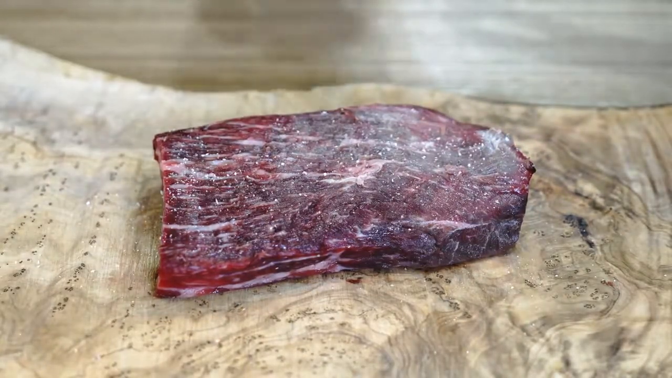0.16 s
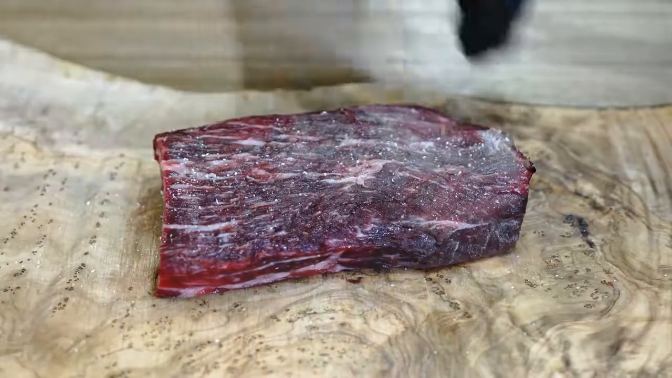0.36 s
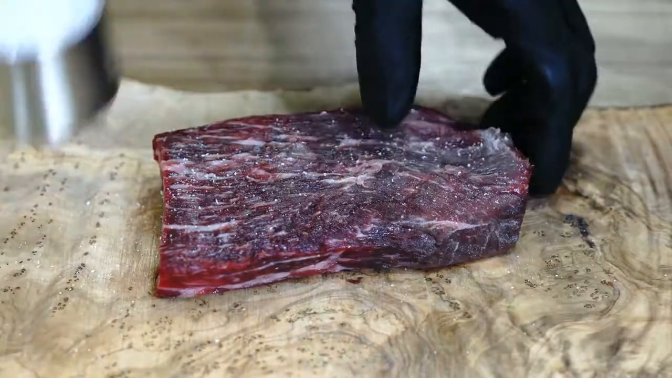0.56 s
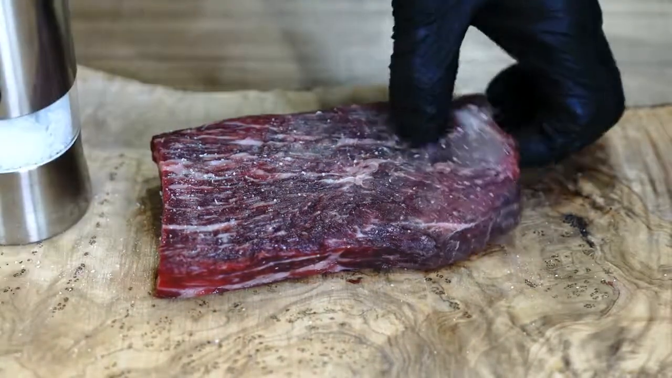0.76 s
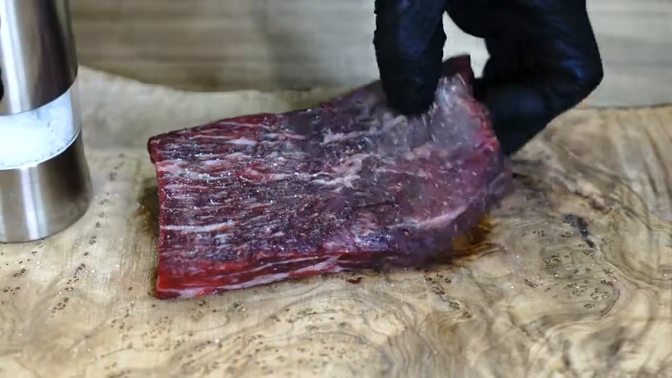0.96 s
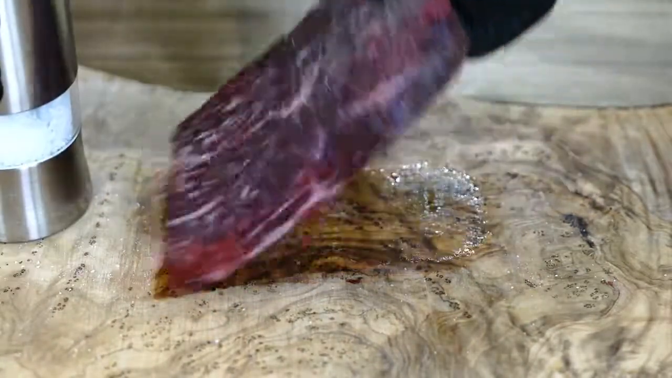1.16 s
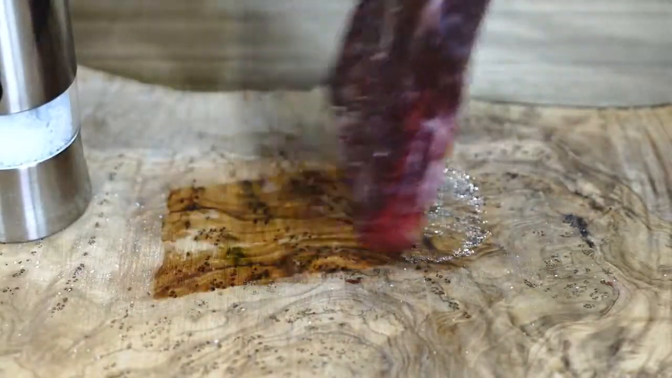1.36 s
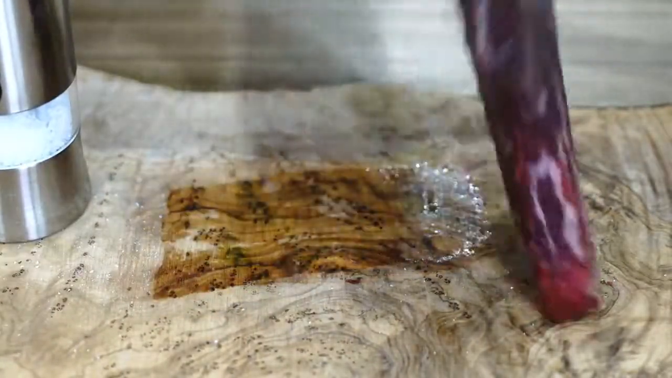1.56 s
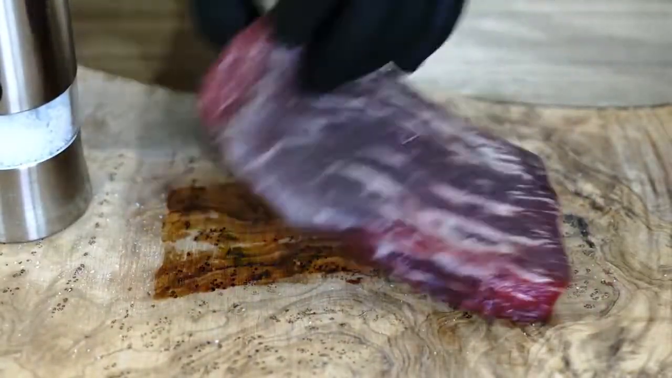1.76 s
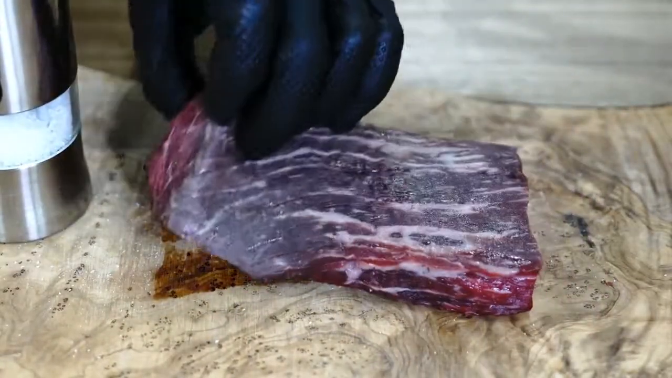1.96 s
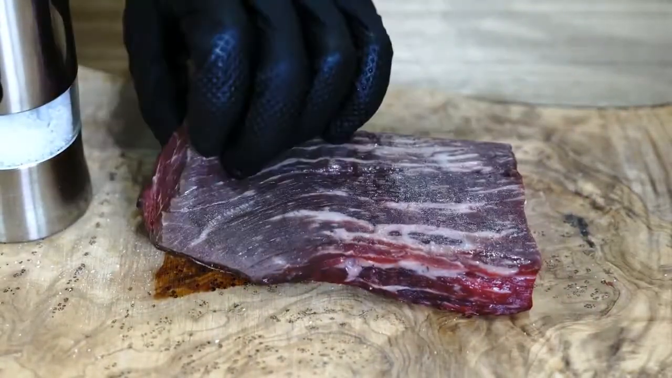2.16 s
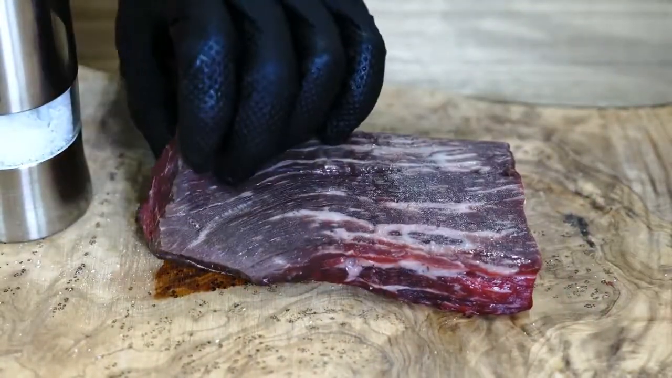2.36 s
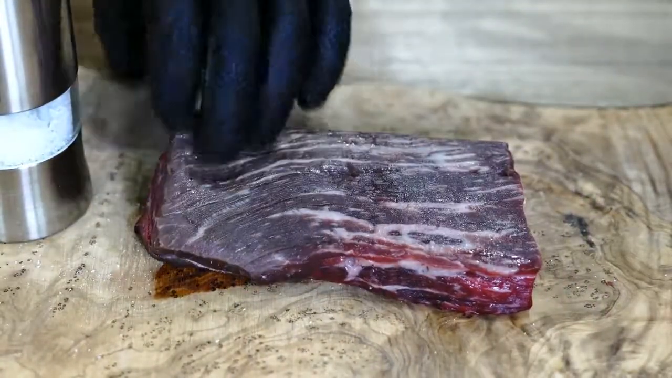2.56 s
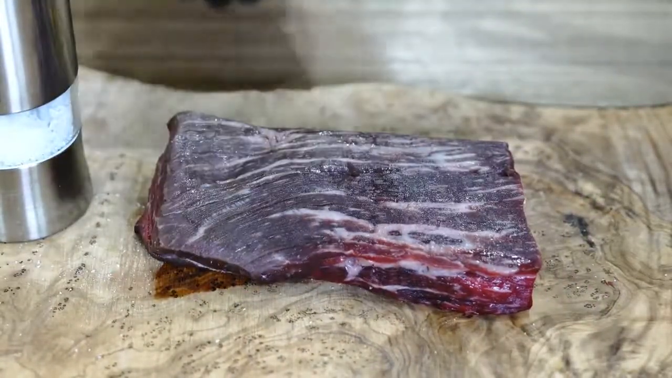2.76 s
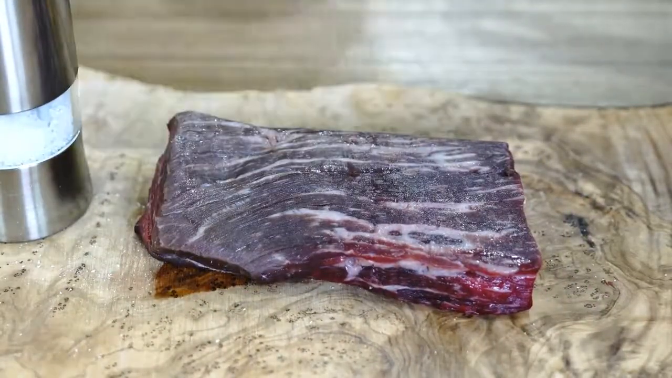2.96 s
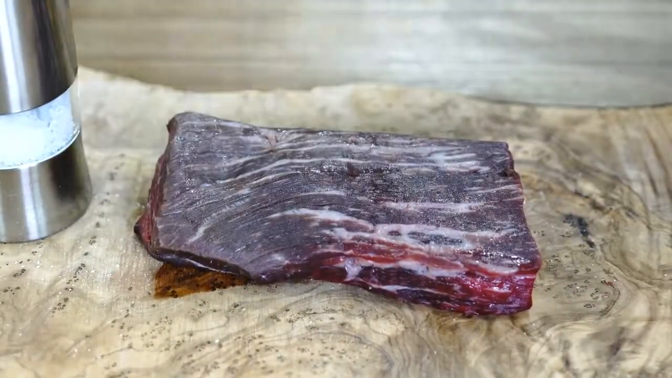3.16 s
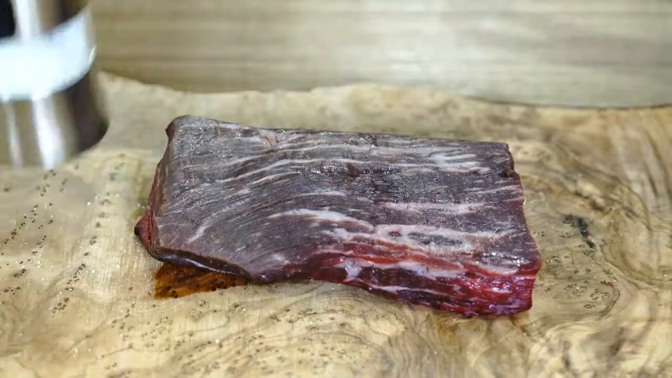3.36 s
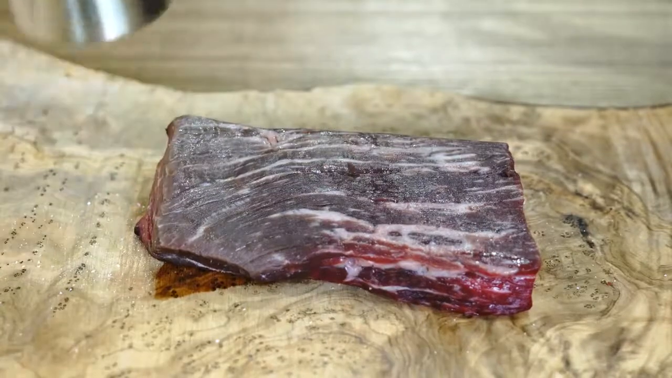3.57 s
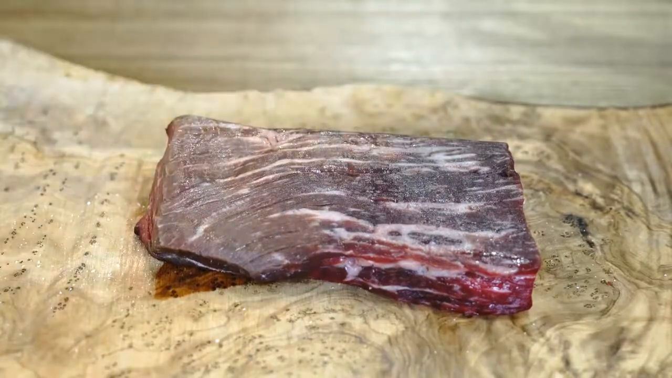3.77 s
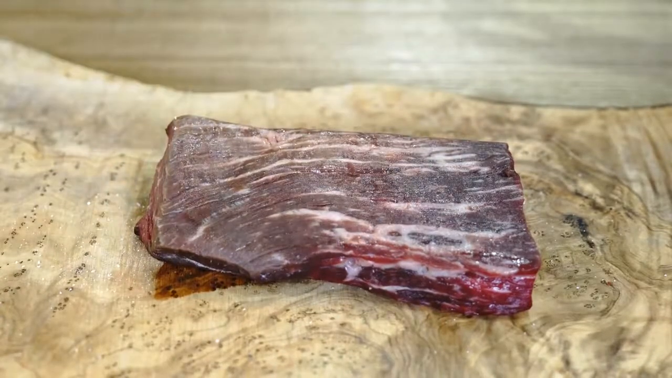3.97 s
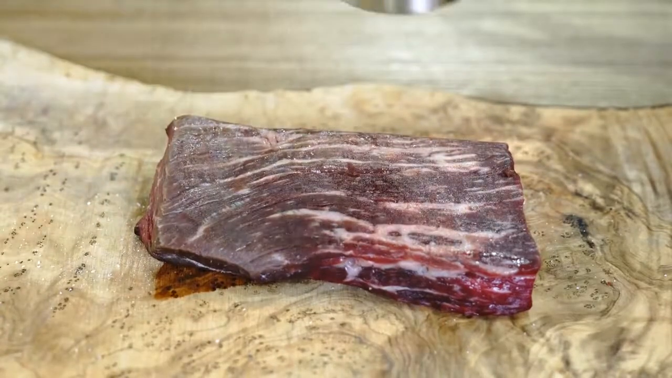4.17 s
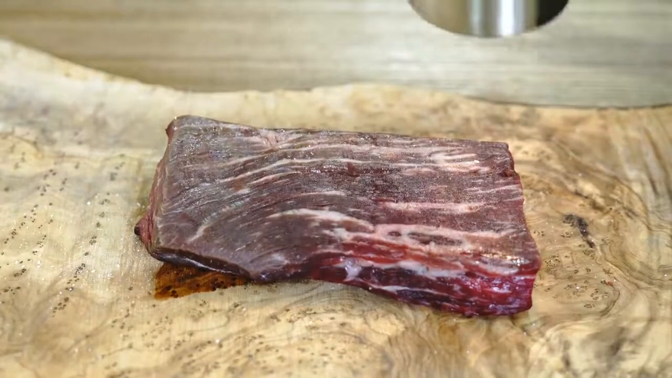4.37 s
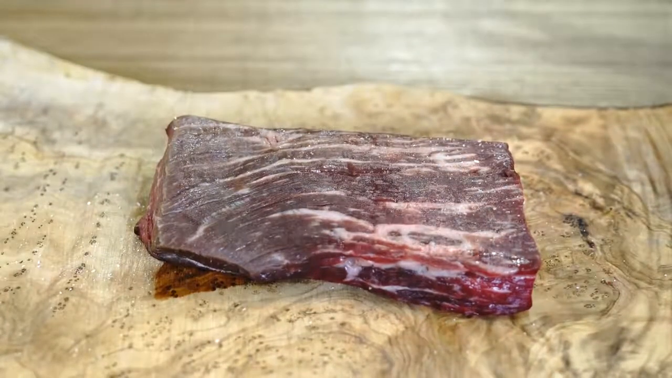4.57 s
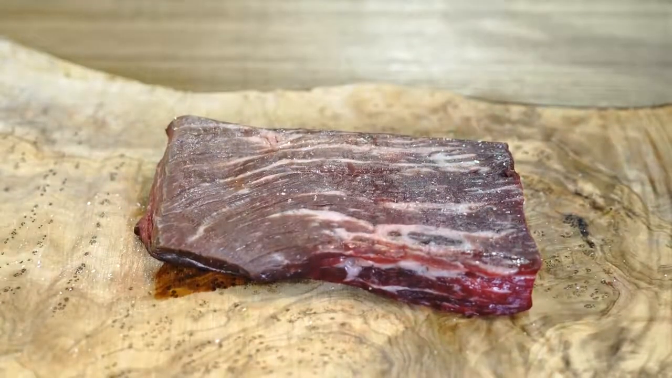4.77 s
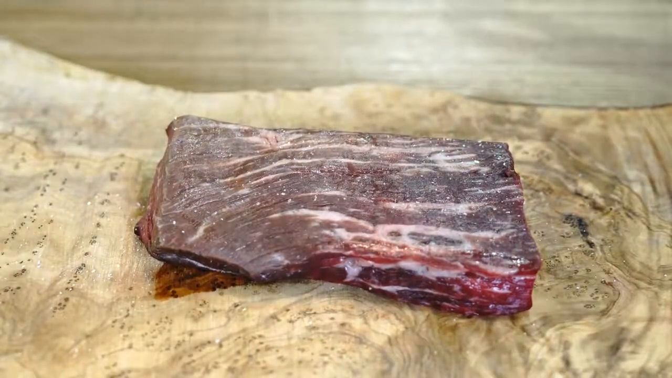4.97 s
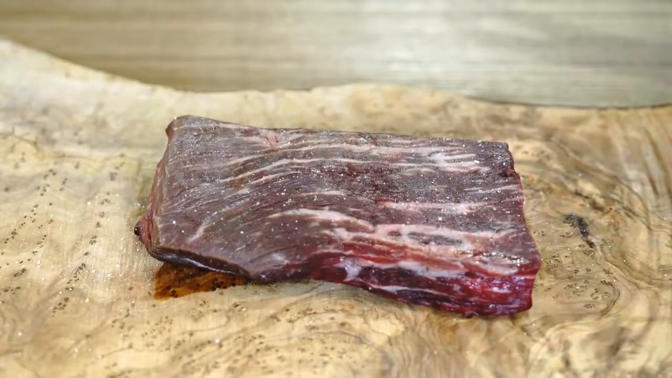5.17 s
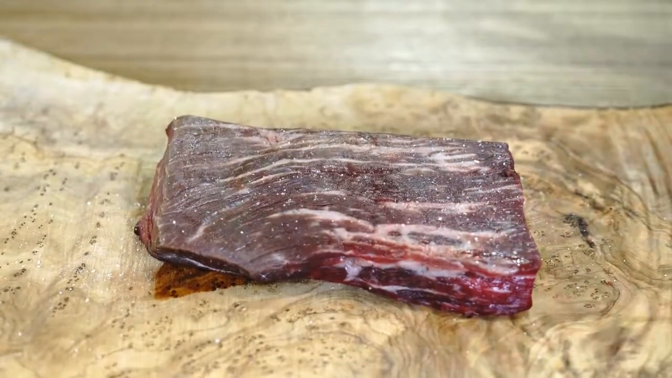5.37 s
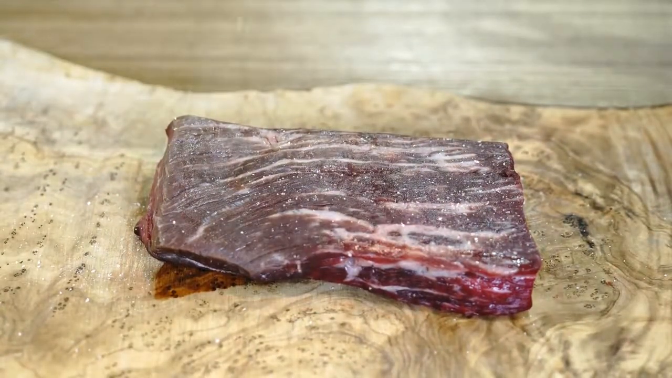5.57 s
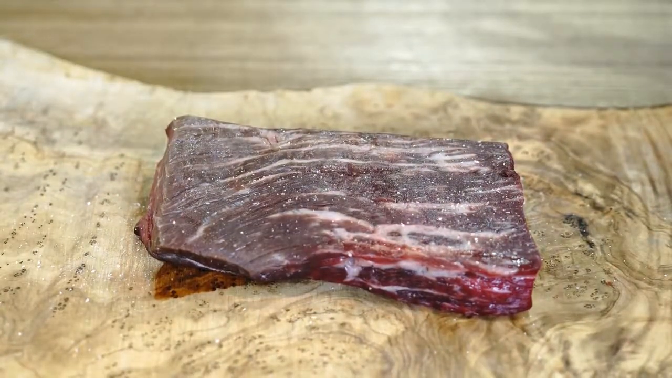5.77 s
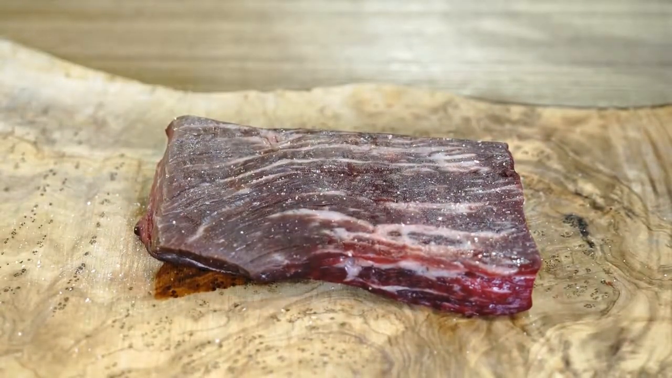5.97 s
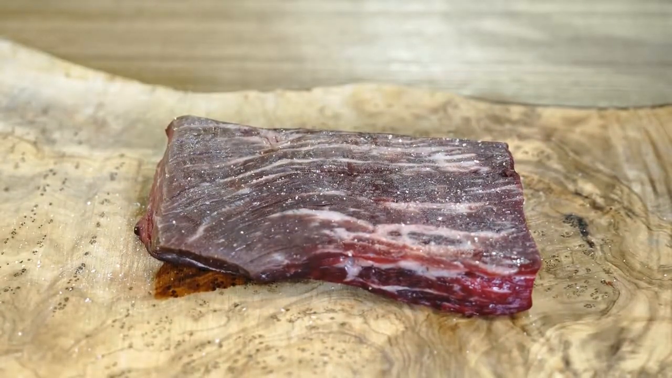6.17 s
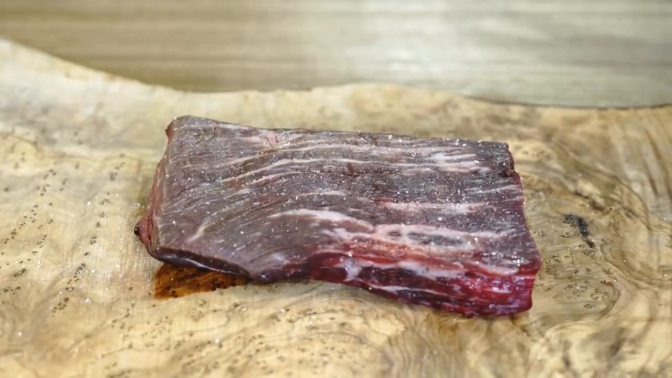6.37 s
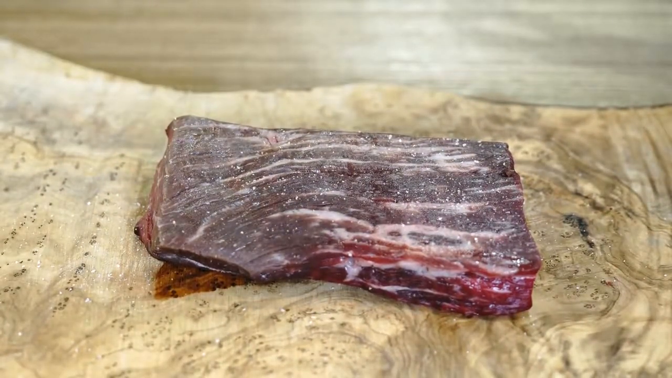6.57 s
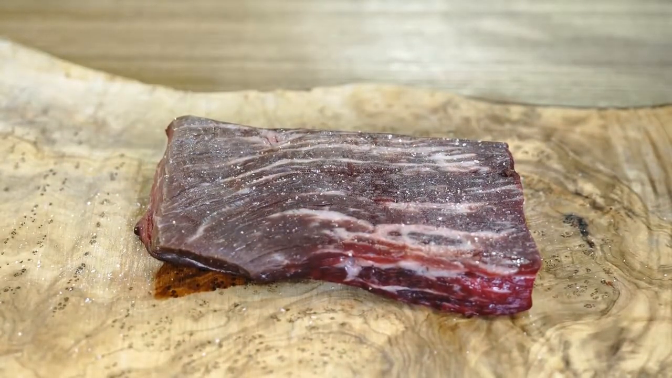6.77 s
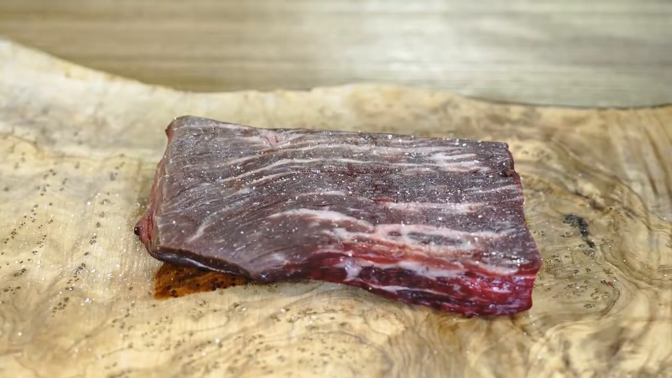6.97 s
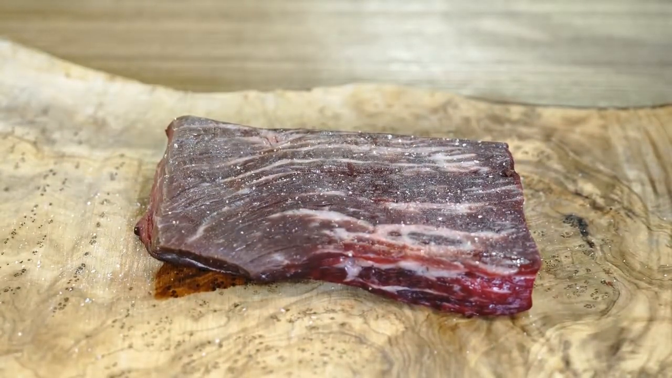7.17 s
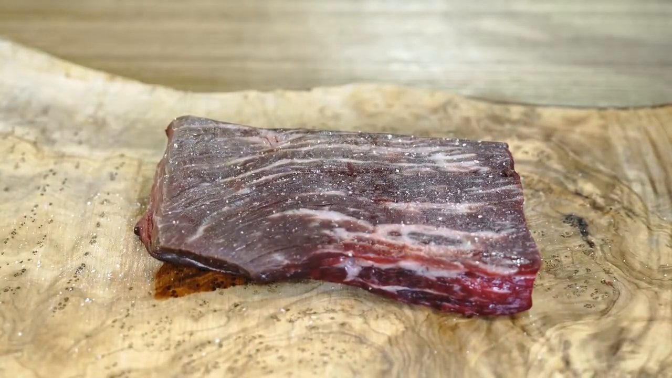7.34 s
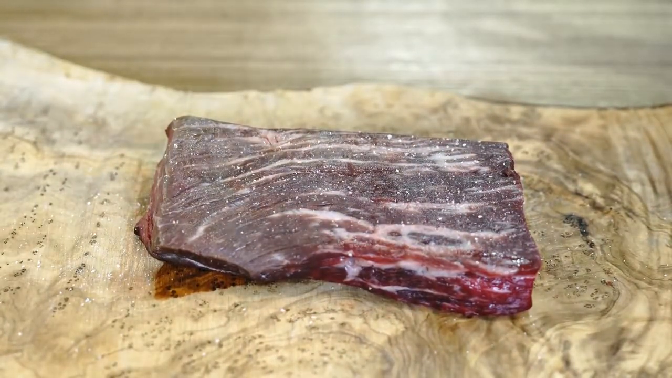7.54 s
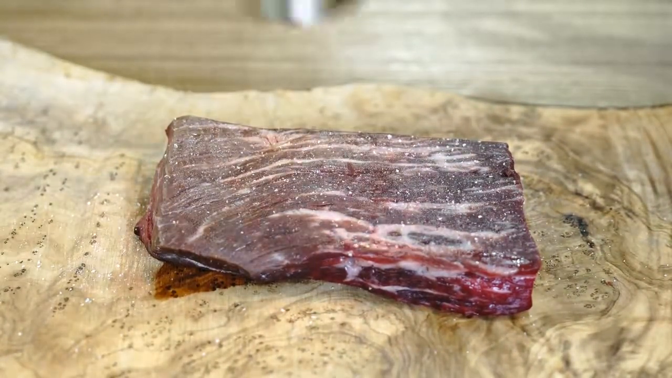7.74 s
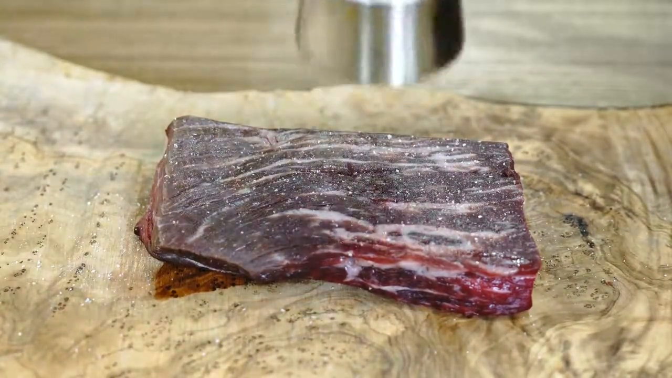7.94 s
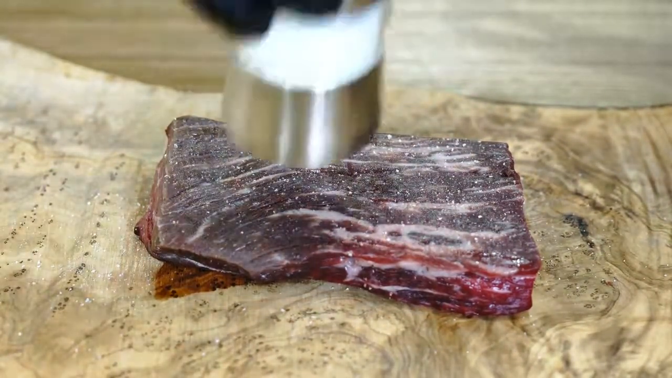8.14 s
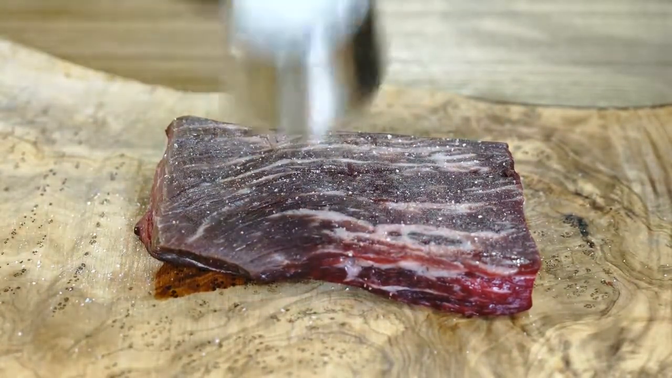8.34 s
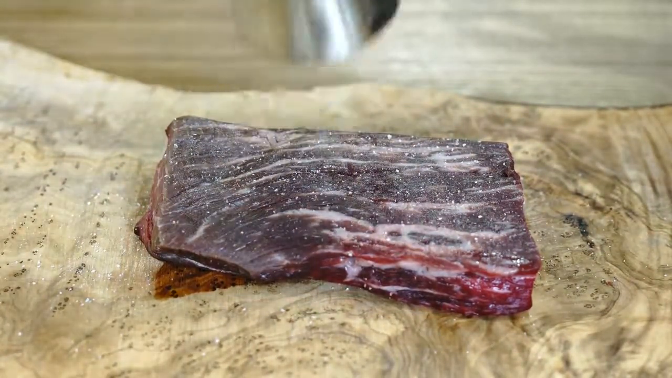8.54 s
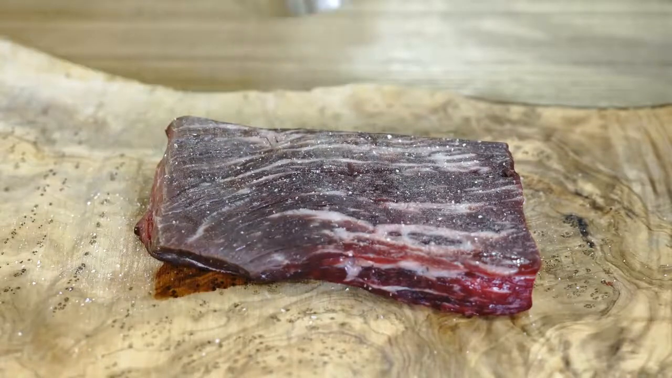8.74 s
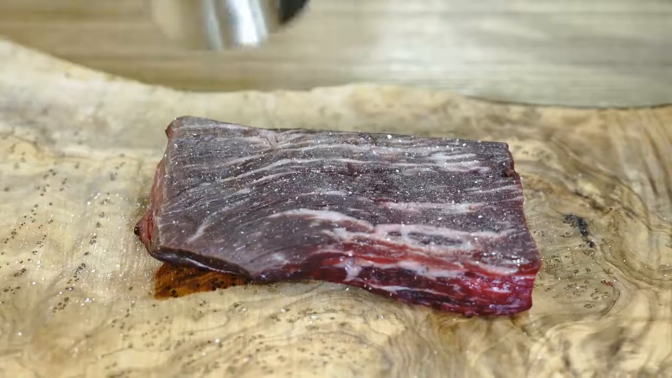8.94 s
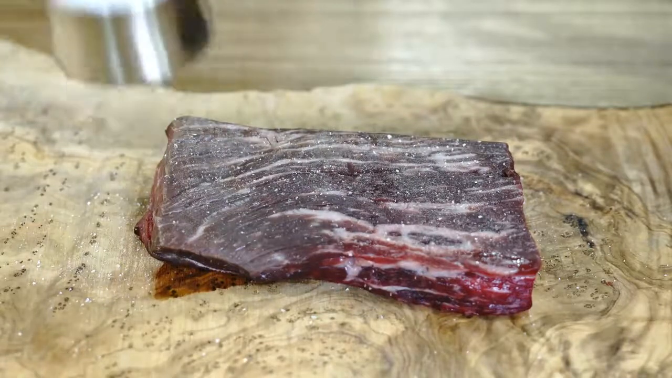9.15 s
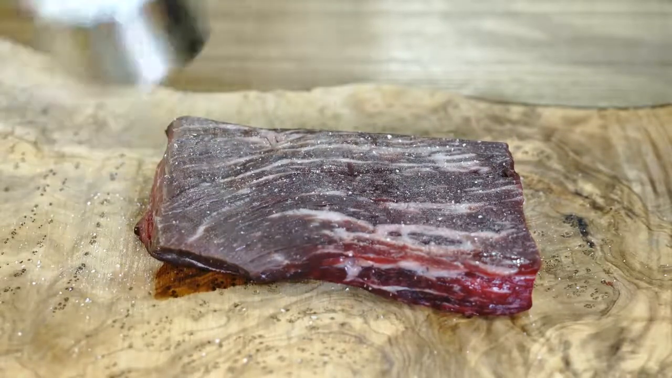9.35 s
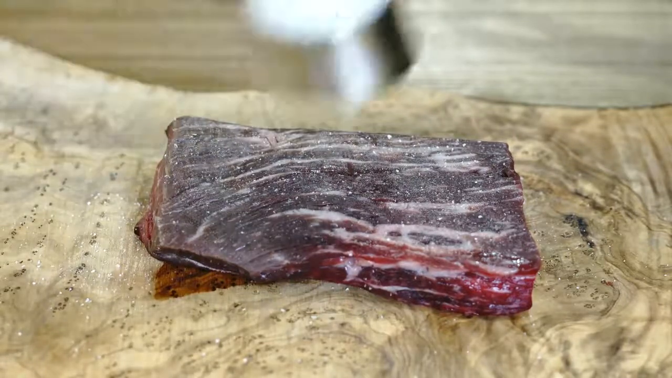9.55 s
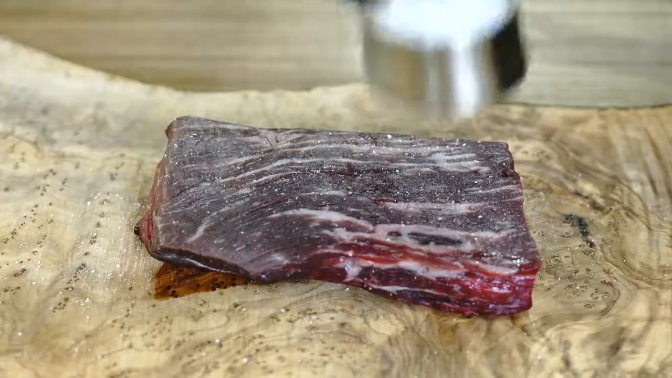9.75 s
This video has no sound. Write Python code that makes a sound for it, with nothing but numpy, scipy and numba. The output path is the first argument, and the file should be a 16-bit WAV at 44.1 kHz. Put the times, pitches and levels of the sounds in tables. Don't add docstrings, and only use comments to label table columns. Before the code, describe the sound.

A battery salt mill whirrs and crunches briefly, is set down with a knock, gloves rustle, then it grinds longer and is shaken with swishing salt.

```python
import sys
import numpy as np
from scipy import signal
from scipy.fft import rfft, irfft
from scipy.io import wavfile
from scipy.ndimage import uniform_filter1d
from numba import njit

SR = 44100
rng = np.random.default_rng(int(sys.argv[2]) if len(sys.argv) > 2 else 0)


def invert_db(x):
    u = np.asarray(x, float) / 20
    return 10 ** u


def materialize(psi):
    bounded = np.clip(np.atleast_2d(psi).T, -1, 1)
    quanta = np.round(bounded * 32767).astype(np.int16)
    wavfile.write(sys.argv[1], SR, quanta)


N = 432621


def level(x, db):
    return x * invert_db(db) / np.sqrt(np.mean(x ** 2))


def hiss():
    return rng.standard_normal(N)


def curve(table):
    s, *columns = np.transpose(table)
    return [np.interp(np.arange(N) / SR, s, c) for c in columns]


def walk(rate):
    k = int(SR / rate)
    steps = np.repeat(rng.standard_normal(N // k + 1), k)
    return 1.31 * uniform_filter1d(uniform_filter1d(steps, k), k)[:N]


def colour(x, shape):
    hz, db = np.transpose(shape)
    grid = np.log(np.arange(2049) * SR / 4096 + 1)
    log_gain = np.interp(grid, np.log(hz), np.maximum(db, -70)) * np.log(10) / 20
    ceps = irfft(log_gain)
    ceps[1:2048], ceps[2049:] = 2 * ceps[1:2048], 0
    impulse = irfft(np.exp(rfft(ceps)))
    return level(signal.fftconvolve(x, impulse)[:N], 0)


@njit
def svf(x, hz, width):
    y, b, l = np.empty(len(x)), 0., 0.
    for i in range(len(x)):
        g, k = np.tan(np.pi * hz[i] / SR), width / hz[i]
        v = (b + g * (x[i] - l)) / (1 + g * (g + k))
        b, l, y[i] = 2 * v - b, l + 2 * g * v, k * v
    return y


def resonance(x, hz, width):
    return level(svf(svf(x, hz, width), hz, width), 0)


def grains(rate, spread_db, length_s):
    chance = rng.random((2, N))
    sizes = (chance[0] < rate / SR) * invert_db(-spread_db * np.log(chance[1] + 6e-3))
    power = signal.lfilter([1], [1, -np.exp(-2 / (length_s * SR))], sizes ** 2)
    return level(np.sqrt(power), 0)


def flow(heaps, rise_s, fall_s):
    t, power = np.arange(N) / SR, 0
    for s, lasts, db in heaps:
        drop = np.maximum((s - t) / rise_s, 0) + np.maximum((t - s - lasts) / fall_s, 0)
        power = power + invert_db(db - 60 * np.minimum(drop, 4)) ** 2
    return np.sqrt(power)


# t/s, salt in the burr level/dB, outlet ring f/Hz, outlet turned to the microphone level/dB
WORK = [(0.05, -26, 10800, 3), (.33, -25.5, 12200, 1), (3.7, -26.5, 12300, -3.5), (3.86, -28, 12400, 2.5),
        (4.23, -29, 11400, 2.5), (4.33, -26.5, 11360, 4), (4.66, -28.5, 11800, 4),
        (4.81, -26.5, 11230, -1.5), (4.95, -27, 11000, -1), (5.12, -23, 11400, -0.5),
        (5.4, -31.5, 10900, 1), (5.6, -26, 10800, 2), (6.12, -26.5, 10850, 0.5), (6.38, -26, 10600, 0),
        (6.7, -26.5, 10200, 4), (7.05, -27, 9600, -1), (7.4, -27, 10800, 1.5), (7.75, -28.5, 11400, 4),
        (7.88, -27.5, 11700, -4.5)]
# t/s, f/Hz, level/dB
WHINE = [(.01, 956, -18), (.06, 1094, -29), (.17, 1134, -26), (.3, 1022, -24.5), (3.72, 769, -24.5),
         (3.77, 995, -29.5), (4.02, 980, -30), (4.06, 871, -28), (4.25, 817, -25.5), (4.31, 1070, -44),
         (4.7, 1124, -31), (4.8, 896, -40), (5.2, 1000, -38), (5.4, 932, -31.5), (5.56, 1097, -26),
         (5.83, 932, -20.5), (6.15, 935, -25), (6.3, 1041, -23.5), (6.76, 1000, -21.5), (7.04, 781, -26),
         (7.17, 1010, -29), (7.35, 1068, -29.5), (7.6, 965, -34), (7.86, 1000, -36)]
# t/s, f/Hz, level/dB
STRAIN = [(.04, 2120, -24), (.15, 2145, -31.5), (.31, 1960, -21.5), (.37, 1900, -24), (3.72, 1620, -30),
          (3.86, 2010, -20.5), (4.05, 1837, -24), (4.2, 1630, -21), (4.3, 1923, -26), (4.5, 2050, -31.5),
          (5.0, 2097, -46), (5.45, 1937, -36), (5.6, 2109, -23.5), (5.75, 1880, -22.5), (5.93, 1963, -22),
          (6.15, 1795, -20), (6.25, 1960, -26), (6.45, 2070, -24), (6.68, 2084, -21), (6.76, 2205, -21),
          (6.85, 1803, -20), (7.08, 1648, -22), (7.3, 1943, -31), (7.86, 2125, -39)]
FIZZ_DB, FIZZ_PER_SALT = -25, 0.99


def mill():
    crunch_db, fizz_hz, facing_db = curve(WORK)
    whine_hz, whine_db = curve(WHINE)
    over_hz, over_db = curve(STRAIN)
    fizz_db = FIZZ_DB + FIZZ_PER_SALT * (crunch_db + 26) + facing_db
    rumble_db = 0.11 * whine_db + 0.56 * crunch_db - 8.0
    turn = 1 + 0.24 * np.sin(2 * np.pi * np.cumsum(whine_hz / 9) / SR)
    crush = grains(2000, 2.6, .0012)
    load = invert_db(0.86 * walk(24) + 1.09 * walk(70))
    drive = turn * (.7 + .6 * crush) * invert_db(1.5 * walk(90))
    gears = invert_db(whine_db - 4.0) * gear_whine(drive, whine_hz) + invert_db(rumble_db) * housing_rumble(drive)
    salt = invert_db(over_db - 4.0) * gear_strain(drive, over_hz)
    salt = salt + invert_db(crunch_db - 1.0) * (burr_crunch(crush, over_db) + stray_splinters())
    salt = salt + invert_db(fizz_db + 0.5) * outlet_fizz(crush, fizz_hz)
    return load * lull() * (motor(False) * gears + motor(True) * salt)


def gear_whine(drive, whine_hz):
    whine = 0
    for db, wander, width in ((0, .014, 95.), (-5, .04, 260.)):
        hz = whine_hz * (1 + wander * walk(35))
        whine = whine + invert_db(db + 2.0 * walk(40)) * resonance(drive * hiss(), hz, width)
    return level(whine, 0)


def gear_strain(drive, over_hz):
    over = 0
    for db, part in zip((-3, 0, 0, -5), (.8, .99, 1.02, 1.27)):
        strand = resonance(drive * hiss(), over_hz * (part + .025 * walk(22)), 120.)
        over = over + invert_db(db + 2.5 * walk(50)) * strand
    skirt = level(svf(drive * hiss(), over_hz, 720.0), -0.017)
    return level(over, 0) + skirt


# f/Hz, level/dB per Hz
RUMBLE = [(24, -65), (40, -48.5), (254, -26), (490, -8), (882, -3.5), (1020, -3.5), (1190, -6),
          (1700, -10.5), (2000, -13), (2800, -14), (3640, -40), (6160, -120)]


def housing_rumble(drive):
    return level(colour(drive * hiss(), RUMBLE), -3.5)


# f/Hz, level/dB per Hz
CRUNCH = [(1350, -37.5), (2300, -1.5), (2880, -2), (3400, -6.5), (5000, -2.5), (6650, 0.5), (7760, 0.5),
          (8590, -9.5), (9500, -14.5), (12400, -31), (20900, -120)]
SHELL_RINGS_HZ = [5300, 6500, 7500]
SHELL_RING_DB, RING_PER_STRAIN = -4, .3


def burr_crunch(crush, over_db):
    crunch = invert_db(0.6 * walk(6)) * colour((.5 + 2.2 * crush) * hiss(), CRUNCH)
    for hz in SHELL_RINGS_HZ:
        ring_db = SHELL_RING_DB + RING_PER_STRAIN * (over_db + 27) + 1.6 * walk(10)
        crunch = crunch + invert_db(ring_db) * svf(crunch, hz * (1 + 0.068 * walk(5)), 500.)
    return crunch


def stray_splinters():
    return level(svf(grains(150, 2.5, .0008) * hiss(), np.full(N, 7000.), 11000.), -15)


# f/Hz, level/dB per Hz
FIZZ = [(4710, -25.5), (8000, -12), (8790, -7), (10500, -3), (12800, -3), (15100, -5.5), (16200, -9)]
# t/s, level/dB
OUTLET = [(0, -6.5), (3.7, 0), (4.3, -7), (4.45, -0.5), (4.88, 4), (5.05, 0), (5.9, -9), (6.3, 1.5),
          (6.6, 0), (7.1, 1), (7.3, 4), (7.65, 0.5), (7.8, 9.5)]
# f/Hz above the outlet ring, level/dB
OUTLET_RINGS = [(0, 0), (2000, -4.5)]


def outlet_fizz(crush, fizz_hz):
    fine = invert_db(0.45 * walk(2.4)) * colour((0.4 + 0.53 * crush) * hiss(), FIZZ)
    tilt_db, fizz = curve(OUTLET)[0], fine
    for above_hz, db in OUTLET_RINGS:
        hz = (fizz_hz + above_hz) * (1 + .02 * walk(8))
        fizz = fizz + invert_db(db + tilt_db + 1.37 * walk(8)) * svf(fine, hz, 1600.)
    return level(fizz, 0)


# switch on t/s, switch off t/s, time to lose 20 dB t/s
RUNS = [
    (-.2, .378, .04),
    (3.684, 7.906, .092),
]
SPIN_UP_S, COAST_DB_PER_S = .07, 540


def motor(loaded):
    t, gain = np.arange(N) / SR, 0
    for on, off, coast_s in RUNS:
        after = np.maximum(t - off, 0)
        drop_db = COAST_DB_PER_S * after if loaded else 20 * np.minimum(after / coast_s, 4) ** 2
        gain = gain + np.sqrt(np.clip((t - on) / SPIN_UP_S, 0, 1)) * invert_db(-drop_db)
    return gain


# t/s, peak level/dB, ring f/Hz, housing level/dB re peak
CRACKS = [(0.1414, -2, 7470, -2), (0.2583, 0.5, 7240, 2.5), (.32, -12, 6800, 8), (0.3779, -1.5, 4000, 6.5),
          (3.686, -17.5, 6400, 10.5), (4.0114, 0.5, 7600, -2.5), (4.0688, -4.5, 6400, 6),
          (4.2724, 4.5, 5740, -8), (4.3267, 9, 5640, 5), (4.4157, -1, 7500, -0.5), (4.589, -3, 7270, -3),
          (4.792, 7, 6100, 0), (4.862, -10.5, 6840, 13.5), (4.969, 0, 8000, -12), (4.989, 7.5, 3880, -1),
          (5.038, 2.5, 6050, -2.5), (5.0734, -2, 7240, 2), (5.1103, 10, 5700, 3), (5.1737, -3, 3290, -26),
          (5.2583, 4, 4900, -15), (5.5401, -7, 5000, 17), (6.0847, 6, 6530, -30), (6.1203, -1, 6150, 6),
          (6.194, 4.5, 6810, -28), (6.298, -4, 6190, 3.5), (6.4227, 0.5, 7820, -2.5), (6.58, -3, 6800, -4),
          (6.608, -2, 6900, 9), (6.512, 2, 7600, -12), (6.7898, 9.5, 6040, -6), (7.0118, -2.5, 4860, -5),
          (7.128, 5, 5200, -18), (7.4065, -2, 7660, 12), (7.906, 8, 2970, -20)]
LULL, LULL_S = 0.079, 0.16


def lull():
    jolt = np.zeros(N)
    for s, db, *_ in CRACKS:
        jolt[int((s + .003) * SR)] = np.clip(LULL * invert_db(db - 4), 0, .8)
    return 1 - np.minimum(signal.lfilter([1], [1, -np.exp(-1 / (LULL_S * SR))], jolt), .8)


# t/s, peak level/dB, ring f/Hz
CHIPS = [(0.1061, -12, 6700), (0.111, -10, 5300), (0.404, -6.5, 6550), (3.72, -10, 6670),
         (3.824, -3.5, 4530), (3.8473, -1, 6800), (3.8831, -17, 6700), (4.0885, -0.5, 5870),
         (4.219, -12, 7200), (4.2524, -9, 7100), (4.285, 1.5, 7300), (4.51, -11, 11600),
         (4.555, -14, 11500), (4.6443, -26, 11600), (4.7172, -9, 6500), (4.762, -13, 7300),
         (4.778, -7, 7300), (4.7987, 6, 6070), (4.8403, -3, 7500), (4.886, -9.5, 5900), (5.0078, 3, 7100),
         (5.0314, -7.5, 6330), (5.0457, -14, 6300), (5.08, -8.5, 6900), (5.098, -8, 7930),
         (5.1641, -2, 12600), (5.2261, -21, 11900), (5.2666, -4, 10490), (5.335, -20, 14200),
         (5.432, -8.5, 4000), (5.5063, 1, 7400), (5.6071, -15, 7000), (5.6749, -9, 6800),
         (5.7383, -10, 13400), (5.7746, -3, 13500), (5.8404, -20, 6440), (5.8764, -4, 7000),
         (5.9199, -6, 6500), (6.0752, -1, 6700), (6.221, -3, 6900), (6.312, 2.5, 6500), (6.4638, -6, 6800),
         (6.525, 1.5, 2380), (6.8, 0.5, 6500), (6.837, -8, 2400), (6.8546, -4, 7800), (7.0002, -5, 2500),
         (7.0502, -6, 5990), (7.057, -1.5, 7040), (7.11, 0, 7400), (7.134, -2, 2400), (7.3519, -14, 11600),
         (7.369, -9, 7126), (7.4795, 0.5, 11800), (7.614, -3.5, 7984), (7.626, -3, 2400), (7.709, -9, 5080),
         (7.7637, -8, 11200), (7.7767, -4, 11600), (7.8205, -2, 5650)]
# t/s, peak level/dB, ring f/Hz, housing level/dB re peak
TICKS = [(0.6444, -23, 3800, -22), (0.69, -22, 3820, -13), (1.0234, -23, 3910, -15), (1.07, -29.5, 5700, 6),
         (1.1264, -24, 3500, -8), (1.2705, -30, 3210, -13), (1.4142, -36.5, 7520, -19),
         (1.7195, -21, 1800, -18), (1.7225, -28, 1000, -16), (1.8098, -35, 6800, -18),
         (2.064, -38, 3470, -12), (2.135, -41, 3480, -12), (2.265, -42, 3600, -15.5),
         (2.35, -38.5, 3500, -11), (2.405, -41, 3000, -12), (2.6453, -21.5, 11100, -32),
         (2.648, -32, 2400, -9), (2.711, -32, 2100, -9), (2.736, -35, 2100, -6), (2.862, -39, 2300, -9),
         (2.922, -27, 1900, -6), (2.959, -33, 2000, -6), (3.2236, -31, 5180, -19), (7.967, -22, 3280, 2),
         (7.986, -20, 6860, -14), (7.3213, -6, 7430, -9), (7.5219, -14, 7380, -9), (.7065, -30, 13300, -30),
         (.7863, -26, 12400, -30), (1.036, -33, 12000, -30), (.803, -28, 7500, -30), (.889, -29, 9500, -30),
         (.899, -23, 9500, -30)]
# t/s, peak level/dB, ring f/Hz
PINGS = [(8.5686, -22, 5490), (8.644, -4, 12900), (8.716, -18, 7470), (8.8169, -21, 6520),
         (8.839, 5, 11500), (8.854, -5, 11900), (8.89, -16, 6770), (8.957, -16, 6660), (9.0467, -10, 7700),
         (9.153, -15, 6440), (9.2724, -5, 12000), (9.2954, -19.5, 5450), (8.449, -9, 6200),
         (9.449, -24, 6050), (9.4895, -4, 4200), (9.673, -9, 12400), (9.6905, -14.5, 4500)]
CHIP_HOUSING_DB, CHIP_BOOST_DB, PING_HOUSING_DB = -2, -0.5, -43


def cracks():
    chips = [(s, db + CHIP_BOOST_DB, hz, CHIP_HOUSING_DB) for s, db, hz in CHIPS]
    pings = [(*ping, PING_HOUSING_DB) for ping in PINGS]
    breaking = snaps(CRACKS, broad=.9, t60=.009) + snaps(chips, broad=.7, t60=.007)
    return breaking + snaps(TICKS + pings, broad=.35, t60=.01)


FIRST_BREAK = 3.5
SNAP_TOP = .92


def snaps(events, broad, t60):
    out, t = np.zeros(N + 2048), np.arange(2048) / SR
    for s, db, hz, housing_db in events:
        noise = rng.standard_normal(2048) + FIRST_BREAK * (t == 0)
        burst = noise * invert_db(-60 * t / t60)
        ring = svf(burst, np.full(2048, 1. * hz), 0.3 * hz)
        edge = np.diff(noise * invert_db(-60 * t / (.9 * t60)), prepend=0)
        housing = svf(burst, np.full(2048, 2100.), 2000.0)
        snap = ring / np.abs(ring).max() + broad * edge / np.abs(edge).max()
        snap = snap + invert_db(housing_db) * housing / np.abs(housing).max()
        out[int(s * SR):int(s * SR) + 2048] += invert_db(db - 5.5) * snap
    limited = np.clip(out[:N], -SNAP_TOP, SNAP_TOP)
    return signal.sosfilt(signal.butter(2, 600, "high", fs=SR, output="sos"), limited)


# t/s, peak level/dB, contact t/ms, damping factor
KNOCKS = [
    (0.377, -22.5, 0.28, 0.71),
    (0.701, -39, 2.1, 1.3),
    (.827, -1, 0.12, 0.54),
    (1.718, -28, 0.082, 1.15),
    (2.499, -33, 2.8, 1.2),
    (7.906, -29, 0.41, 0.81),
]
# f/Hz, level/dB, t60 t/s
BOARD = [(135, -26, 0.046), (264, 1, 0.09), (412, -34, .07), (564, -14, 0.055), (876, -33, 0.06),
         (1180, -0.5, 0.085), (1340, -0.5, 0.027), (1360, -21, 0.054), (1560, -19, 0.1), (1850, -28, 0.07),
         (1880, -11, 0.07), (2260, -23, .05), (2800, -23, 0.05)]
# f/Hz, level/dB per Hz
SLAB = [(59, -59), (100, -33.5), (200, -9), (300, 1), (560, -4.5), (760, -10), (940, -5.5), (1220, 1.5),
        (1750, -3.5), (2000, -7.5), (3300, -10), (4500, -32), (11700, -64), (19800, -120)]


def knocks():
    out, t, slab = np.zeros(N), np.arange(SR // 4) / SR, colour(hiss(), SLAB)
    for s, db, contact_ms, damping in KNOCKS:
        at = slice(int(s * SR), int(s * SR) + len(t))
        ring = invert_db(7.5 - 60 * t / (.14 * damping)) * np.minimum(t / 0.0014, 1) * slab[at]
        for hz, mode_db, t60 in BOARD:
            decay_s = min(t60, 90 / hz) * damping
            ring = ring + invert_db(mode_db - 60 * t / decay_s) * np.sin(2 * np.pi * hz * t)
        ring = np.convolve(ring, np.exp(-t[:300] / (contact_ms / 1000)))[:len(t)]
        out[at] += invert_db(db) * ring / np.abs(ring).max()
    return signal.sosfilt(signal.butter(2, 70, "high", fs=SR, output="sos"), out)


# t/s, peak level/dB
JOLTS = [
    (1.72, -36),
    (4.272, -44),
    (4.324, -26),
    (5.109, -51),
    (5.54, -38),
    (6.084, -33),
    (7.905, -46),
]
# f/Hz, peak level/dB, t60 t/s
WORKTOP = [
    (68, -37, .3),
    (130, -27, .2),
]
WORKTOP_S = .827


def jolts():
    out, t = np.zeros(N), np.arange(2048) / SR
    for s, db in JOLTS:
        swing = np.sin(2 * np.pi * 90 * t) * np.exp(-t / 0.0028)
        out[int(s * SR):int(s * SR) + 2048] += invert_db(db + 1.0) * swing
    since = np.maximum(np.arange(N) / SR - WORKTOP_S, 0)
    for hz, db, t60 in WORKTOP:
        out = out + invert_db(db - 60 * since / t60) * np.sin(2 * np.pi * hz * since)
    return out


TRICKLE_DB, TRICKLE_S = -20.5, 0.37


def slides(heaps, rise_s, fall_s, shape, grain):
    pour = flow(heaps, rise_s, fall_s) + invert_db(TRICKLE_DB) * flow(heaps, rise_s, TRICKLE_S)
    tumble = 1 - grain + grain * grains(2500, 2.6, 0.0005)
    return pour * colour(tumble * hiss(), shape)


# t/s, pours for t/s, level/dB
SHAKES = [(8.155, 0.014, -42.5), (8.18, 0.01, -33), (8.403, 0.0039, -20.5), (8.447, 0.0074, -15.5),
          (8.622, 0.021, -19.5), (8.678, 0.015, -15.5), (8.818, 0.033, -20.5), (8.891, 0.031, -17),
          (9.02, 0.02, -32), (9.046, 0.023, -22), (9.103, 0.035, -19.5), (9.256, 0.025, -23),
          (9.308, 0.042, -21), (9.4, 0.03, -40), (9.452, .02, -31), (9.486, 0.016, -20.5),
          (9.543, 0.021, -18), (9.662, 0.04, -21), (9.742, 0.034, -19.5)]
# f/Hz, level/dB per Hz
SHAKEN = [(290, -61), (500, -25), (797, -21.5), (1040, -17), (1270, -19.5), (2670, -9), (3600, -5),
          (6380, 0), (9180, -4), (12600, -2), (15300, -8.5), (16200, -3)]
SHAKE_RISE_S, SHAKE_FALL_S = 0.055, 0.1


def shakes():
    return slides(SHAKES, SHAKE_RISE_S, SHAKE_FALL_S, SHAKEN, grain=0.71)


# t/s, lasts t/s, level/dB
HOLLOW = [
    (9.43, 0.026, -52),
    (9.59, .05, -55),
]
HOLLOW_HZ = 599
SHELL_HZ, SHELL_WIDTH_HZ, SHELL_DB = 1093, 68, -33.5


def shell():
    column = resonance(hiss(), np.full(N, 1. * SHELL_HZ), 1. * SHELL_WIDTH_HZ)
    hoot = invert_db(SHELL_DB + 1.5 * walk(12)) * flow(SHAKES, SHAKE_RISE_S, SHAKE_FALL_S) * column
    return hoot + flow(HOLLOW, .05, .15) * resonance(hiss(), np.full(N, 1. * HOLLOW_HZ), 45.)


# t/s, pours for t/s, level/dB
SLUMPS = [
    (.613, .04, -36.5),
    (.742, 0.015, -24.5),
    (0.825, 0.0032, -22.5),
    (.922, 0.027, -28),
]
# f/Hz, level/dB per Hz
SLUMPED = [(710, -22), (1200, -15), (1430, -9), (1920, -8.5), (2230, -6), (3230, -6.5), (4940, -10),
           (6850, -11.5), (16200, -17.5)]
SLUMP_HZ = [3400, 4300, 5000, 6300]
SLUMP_RISE_S, SLUMP_FALL_S, SLUMP_WIDTH_HZ = 0.015, 0.084, 3000


def slumps():
    heaps = slides(SLUMPS, SLUMP_RISE_S, SLUMP_FALL_S, SLUMPED, grain=0.63)
    part = np.searchsorted(np.transpose(SLUMPS)[0][1:] - SLUMP_RISE_S, np.arange(N) / SR)
    return 0.35 * heaps + 0.98 * svf(heaps, 1. * np.array(SLUMP_HZ)[part], 1. * SLUMP_WIDTH_HZ)


# t/s, lasts t/s, level/dB
RUBS = [(.45, 0.54, -50), (1.05, 0.12, -53), (1.3, 0.27, -64), (1.72, .01, -56), (1.87, 0.0079, -54.5),
        (1.95, 0.58, -65.5), (2.52, 0.16, -52), (2.75, 0.13, -51.5), (2.92, 0.14, -53.5), (3.05, .2, -54.5)]
# f/Hz, level/dB per Hz
RUB = [(410, -20), (700, -15), (1090, -13.5), (1360, -17.5), (1900, -14.5), (2360, -16.5), (3060, -17.5),
       (6000, -22.5), (7800, -27), (13200, -120)]
# t/s, lasts t/s, level/dB
CRINKLES = [(.45, .3, -61), (.8, .4, -45.5), (1.72, 0.011, -59), (1.87, 0.12, -60), (2.5, 0.11, -55.5),
            (2.59, 0.044, -53), (2.75, .45, -61.5), (3.23, .01, -55)]
# t/s, lasts t/s, level/dB
SCRAPES = [
    (1.108, 0.025, -47.5),
    (2.472, 0.096, -49),
    (2.92, 0.0074, -44),
]
SCRAPE_HZ = [1560, 2540, 1910]
RUB_RISE_S, RUB_FALL_S = 0.43, 0.21
SCRAPE_RISE_S, SCRAPE_FALL_S = 0.018, 0.16


def rustle():
    grit = 0.46 + 0.45 * grains(800, 1.7, 0.0018)
    rub = flow(RUBS, RUB_RISE_S, RUB_FALL_S) * colour(grit * hiss(), RUB)
    rubber = level(svf(grit * hiss(), np.full(N, 8500.), 15000.0), 0)
    crinkle = flow(CRINKLES, RUB_RISE_S, RUB_FALL_S) * rubber
    scrape_hz = np.interp(np.arange(N) / SR, np.transpose(SCRAPES)[0], SCRAPE_HZ)
    scrape = flow(SCRAPES, SCRAPE_RISE_S, SCRAPE_FALL_S) * resonance(grit * hiss(), scrape_hz, 750.)
    return rub + crinkle + scrape


ROOM_T60_S, ROOM_DB, ROOM_TOP_HZ = 0.3, -14.5, 4000


def room(x):
    t = np.arange(SR // 2) / SR
    tail = rng.standard_normal(len(t)) * invert_db(-60 * t / ROOM_T60_S) * (t > .004)
    tail = signal.lfilter(*signal.butter(1, ROOM_TOP_HZ, fs=SR), tail)
    return invert_db(ROOM_DB) * signal.fftconvolve(x, tail / np.sqrt(np.sum(tail ** 2)))[:N]


# f/Hz, level/dB per Hz
KITCHEN = [(20, -22.5), (60, -13.5), (100, -7), (125, -1.5), (160, -11), (215, -3), (300, -7.5), (450, -9),
           (620, -9), (800, -16.5), (1600, -17), (4000, -25.5), (12000, -29.5), (16200, -32.5)]
KITCHEN_DB = -55.5
WHISTLE_HZ, WHISTLE_DB = 13600, -77


def kitchen():
    murmur = level(invert_db(0.27 * walk(6.8)) * colour(hiss(), KITCHEN), KITCHEN_DB)
    whistle = np.sin(2 * np.pi * WHISTLE_HZ * np.arange(N) / SR + 2 * walk(30))
    return murmur + invert_db(WHISTLE_DB) * whistle


def scene():
    near = mill() + shakes() + slumps() + knocks()
    fractures = cracks()
    echo = room(near + .5 * fractures)
    mix = near + fractures + echo + jolts() + rustle() + kitchen() + shell()
    return np.tile(mix, (2, 1))


def low_pass(x):
    return signal.sosfilt(signal.butter(12, 15900, fs=SR, output="sos"), x)


DIP_S, DIP_FADE_S, TOP_HZ = .82, .004, 15750


def record(dry):
    dip = np.clip(np.abs(np.arange(N) / SR - DIP_S) / DIP_FADE_S - .2, 0, 1)
    overload = np.clip(dry * dip, -.97, .97)
    cut = signal.sosfilt(signal.ellip(12, .2, 70, TOP_HZ, fs=SR, output="sos"), overload)
    return low_pass(np.clip(cut, -1, 1))


dry = scene()
out = record(dry)
materialize(out)
```